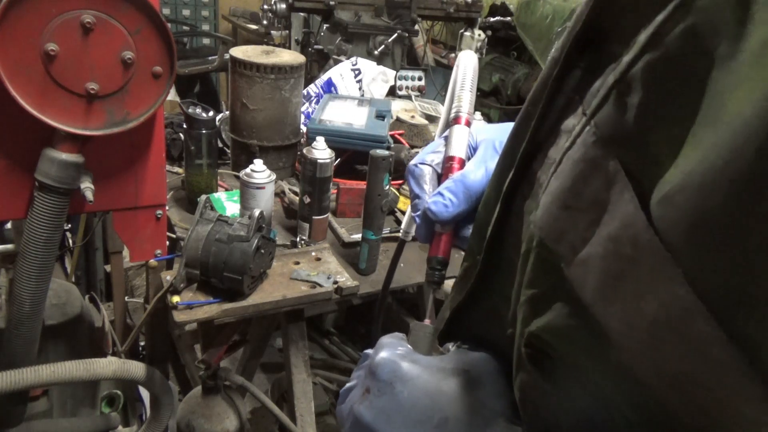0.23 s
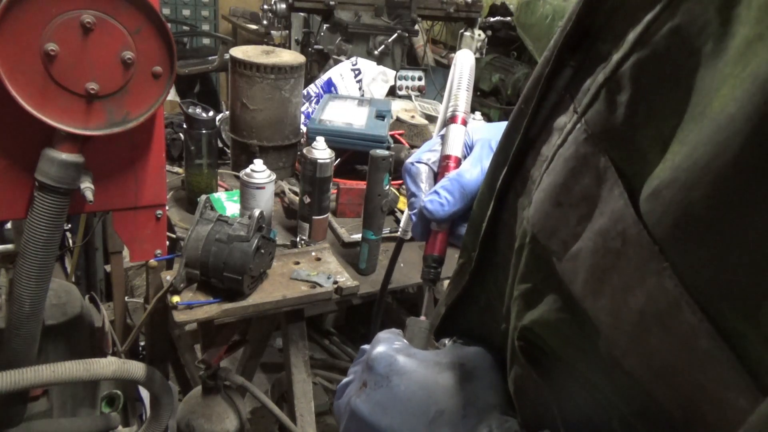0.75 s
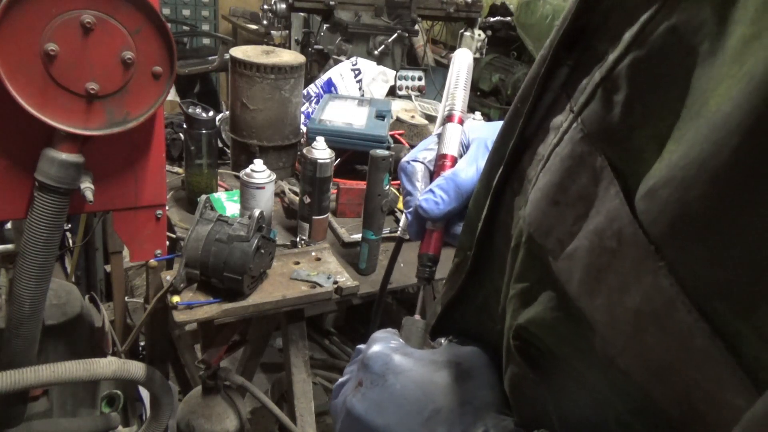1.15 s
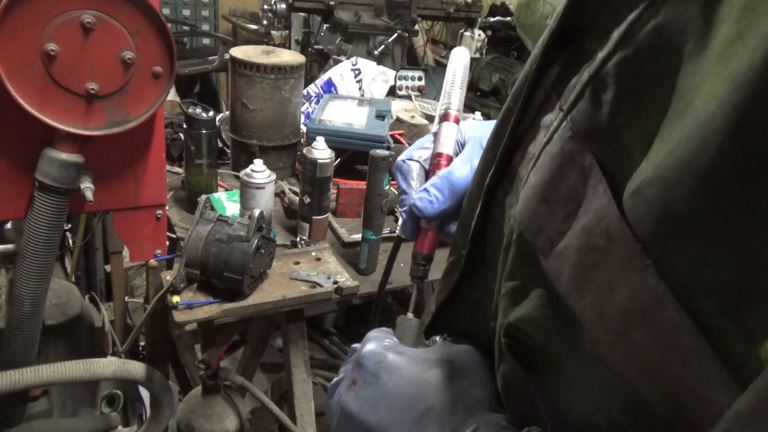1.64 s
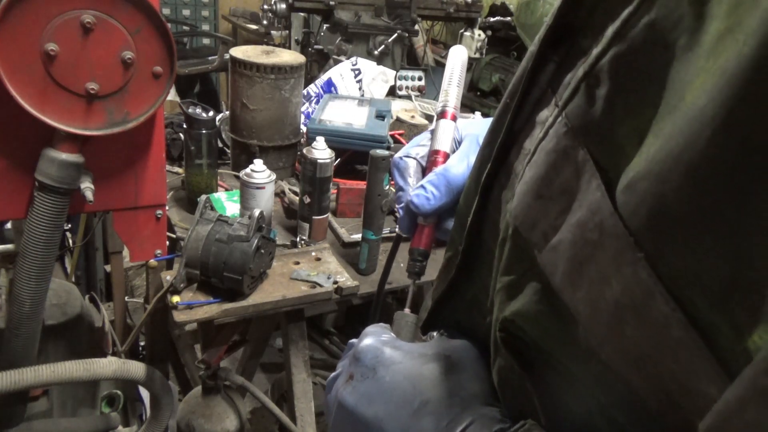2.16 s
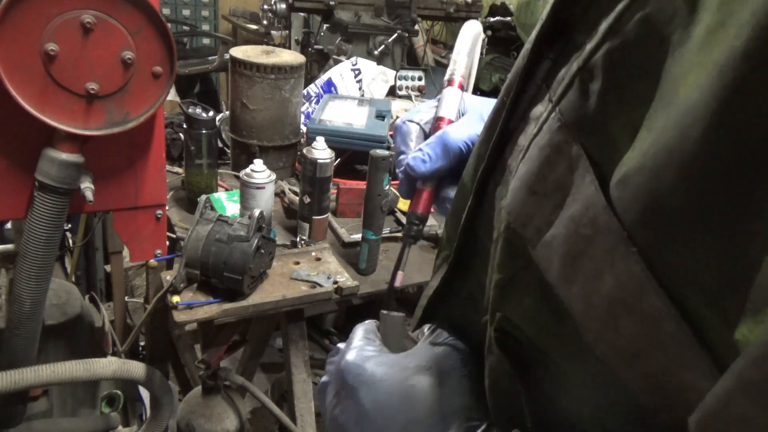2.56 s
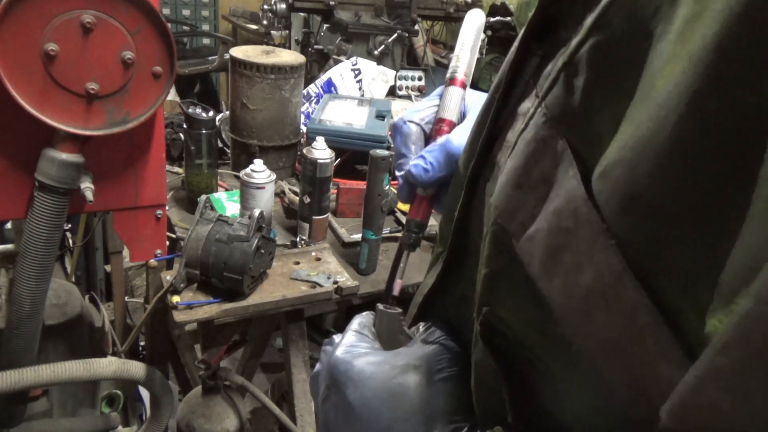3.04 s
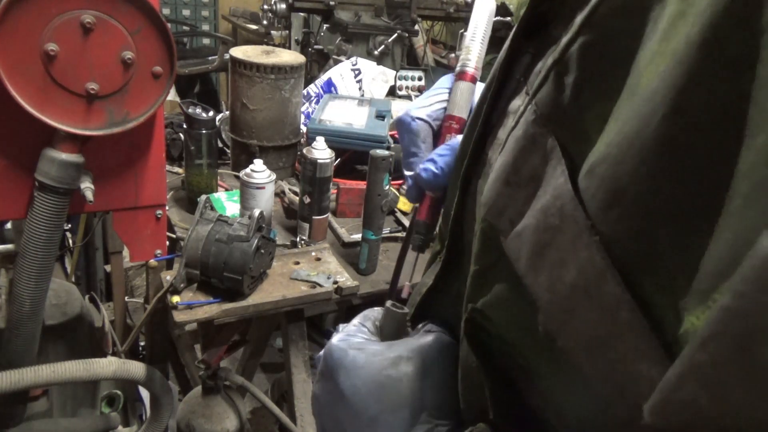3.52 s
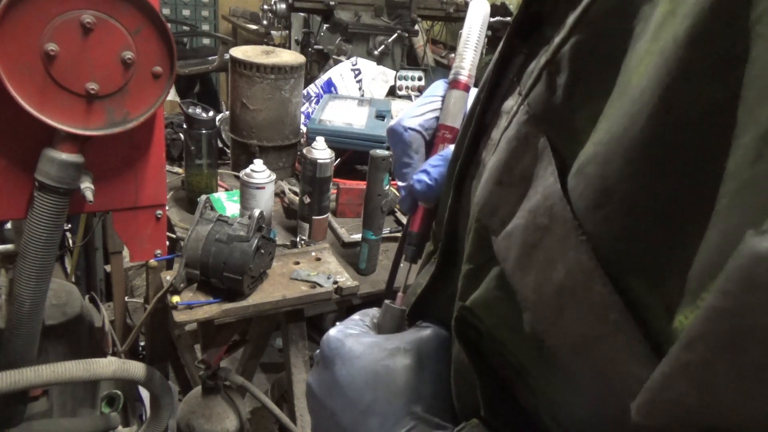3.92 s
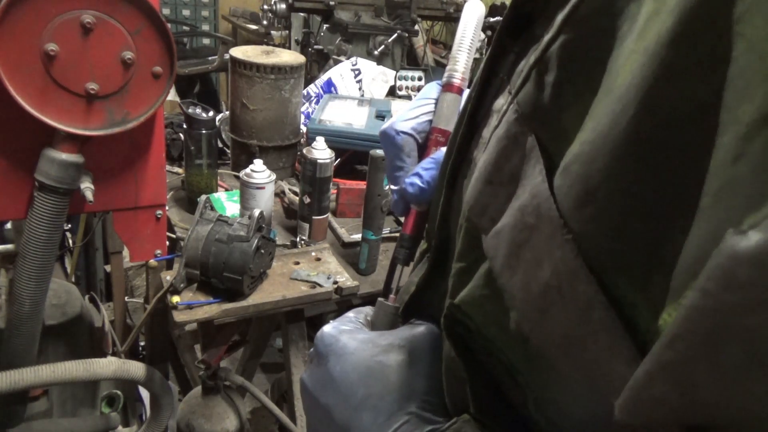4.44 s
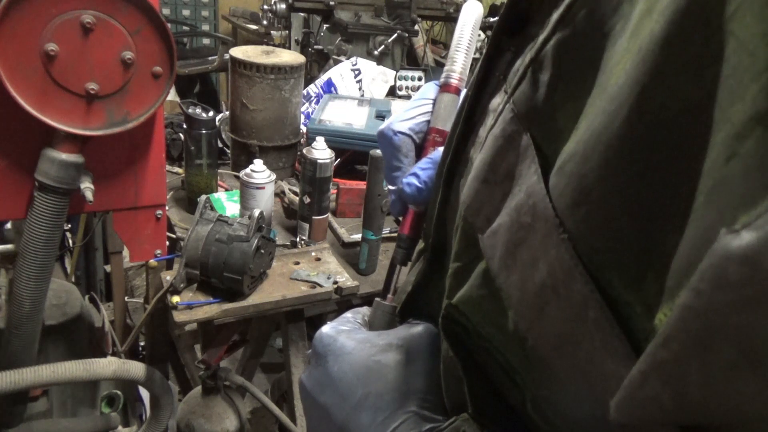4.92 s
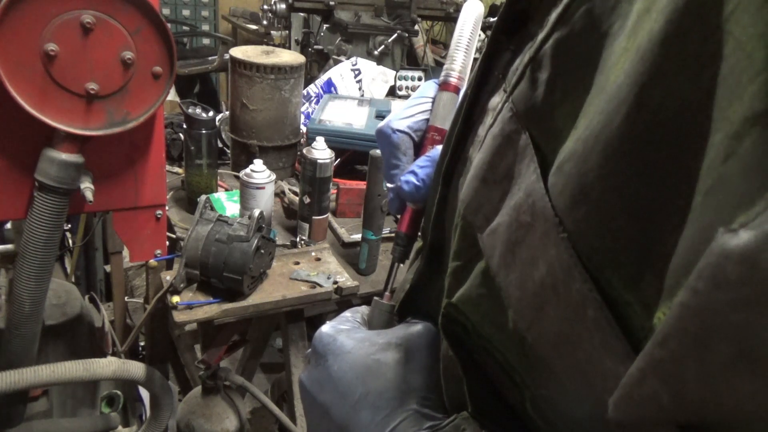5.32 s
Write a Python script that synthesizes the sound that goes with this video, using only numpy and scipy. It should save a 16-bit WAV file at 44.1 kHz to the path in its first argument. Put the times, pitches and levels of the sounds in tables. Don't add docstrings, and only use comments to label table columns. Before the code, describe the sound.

A pneumatic die grinder runs continuously and loudly, close to the microphone, in a cluttered workshop with short, diffuse stereo echoes. From 0 to 2.3 s its toothed cutter presses on a part: a hard buzz around 600 hertz and its multiples, sagging and recovering in pitch, with brief digs, lighter skims and bright gritty hiss. A shrill housing rattle near 7 to 8 kilohertz and steady exhaust air lie over it; faint catches come near 0.5 and 1.3 s. At about 2.3 s the tool lifts, pitch rises slightly, the buzz thins and a piercing, smooth bearing whine stands out, strongest near 3.75 s, while the hiss softens. At 4 s it bites again abruptly, the pitch sagging unevenly and the rough buzz returning with a duller upper edge. A harder tick falls near 4.6 s, a lesser one near 4.85 s. Cutting continues to the 5.6 s end without stopping.

```python
import sys
import numpy as np
from scipy import signal
from scipy.fft import rfft, irfft
from scipy.io import wavfile
from scipy.ndimage import uniform_filter1d

SR = 44100
rng = np.random.default_rng(int(sys.argv[2]) if len(sys.argv) > 2 else 0)


def transcribe(u):
    v = np.clip(np.atleast_2d(u).T, -1, 1)
    q = np.round(v * 32767).astype(np.int16)
    wavfile.write(sys.argv[1], SR, q)


def volts_from_db(level):
    exponent = np.asarray(level, float) / 20
    return 10 ** exponent


N = 245637

# (frequency [Hz], level per Hz [dB])
AIR_COLOUR = [(25, -5.5), (60, -10), (250, -0.5), (560, -3.5), (790, -3.5), (1100, -1), (1600, 0),
              (3000, -1.5), (5000, 4.5), (6500, 3), (9200, 4.5), (12200, -5.5), (14300, 4.5), (17000, 0.5)]
# (frequency [Hz], side level [dB])
ECHO_SPREAD = [(60, -57), (150, -15.5), (400, -28.5), (1200, -23), (3000, -17.5), (6000, -26.5),
               (7800, -19), (10000, -23), (13000, -27)]
# (frequency [Hz], width [Hz], level [dB])
SPINDLE_RING = (13050, 650, -31.5)
# (frequency [Hz], width [Hz], level [dB])
BLOWN_PART = (2970, 620, -46.5)
# (frequency [Hz], width [Hz], share lost [0-1])
SHANK_GAP = (12200, 1100, .75)
# (frequency [Hz], width [Hz], level [dB])
MAIN_RING = [(6540, 970, -25), (7610, 780, -1), (7750, 330, 7), (8270, 1320, -9)]
# (frequency [Hz], width [Hz], level [dB])
UPPER_RING = [(10085, 390, 3.5), (10730, 127, -9.5), (11150, 1070, -3), (12400, 520, -7.5),
              (14060, 640, -11)]
BEARING_ORDERS = [2.115, 4.458, 4.531, 4.844, 8.667, 10.031, 11.646, 11.854, 12.031, 12.198, 12.417, 12.812,
                  13.031, 13.188, 13.417, 14.031, 15.552, 15.792, 16.167, 16.562, 16.792, 16.948, 17.552,
                  17.792, 18.167, 19.698, 20.333, 20.708, 21.094, 21.708]
# (level running free [dB], level under load [dB])
BEARING_LEVELS = [(-47.4, -53.5), (-56.9, -68.0), (-60.7, -67.7), (-58.8, -65.9), (-49.9, -55.4),
                  (-43.4, -48.7), (-37.1, -46.8), (-32.9, -52.6), (-19.9, -32.9), (-37.3, -32.7),
                  (-30.8, -28.0), (-32.0, -26.7), (-33.6, -33.8), (-50.6, -38.3), (-40.6, -35.3),
                  (-47.6, -37.6), (-36.7, -48.5), (-38.3, -43.9), (-35.7, -30.5), (-43.3, -43.5),
                  (-48.5, -41.7), (-44.9, -46.6), (-43.3, -44.9), (-43.3, -44.8), (-43.3, -38.6),
                  (-49.9, -56.4), (-43.0, -45.3), (-45.7, -49.8), (-45.0, -51.1), (-52.6, -55.8)]
# (time [s], speed [turns/s])
SHAFT_SPEED = [(0, 630), (.4, 627), (.6, 620), (.84, 619.2), (1.02, 615.5), (1.13, 604), (1.27, 627.5),
               (1.72, 609.5), (1.85, 619.5), (2.18, 610), (2.42, 636.6), (4.0, 637), (4.4, 614),
               (4.56, 616), (4.77, 601), (5.05, 612.3), (5.45, 600), (5.57, 600.2)]
# (time [s], load [0-1])
LOAD = [(0, 0.97), (1.19, 0.97), (1.2, .1), (1.22, 0.5), (1.23, 1), (2.31, 0.82), (2.33, 0.14),
        (3.99, 0.54), (4.01, .7), (4.1, 0.75), (4.13, 1), (5.57, 0.98)]
# (time [s], share [0-1])
CLEAR = [
    (0, 0.02),
    (2.75, 0.11),
    (2.9, 0),
    (3.05, 0.44),
    (3.5, 0.53),
    (3.75, 0.92),
    (3.95, 0.66),
    (4.05, 0.13),
    (5.57, 0.21),
]
# (time [s], share [0-1])
LEAN = [
    (0, 0.22),
    (1.0, 0.15),
    (2.3, 0.14),
    (2.8, 0.56),
    (3.5, 0.84),
    (4.5, 1),
    (5.57, 1),
]
# (time [s], level of 1st multiple [dB])
UNBALANCE = [(0, -36), (.34, -37), (.98, -39.5), (1.13, -44.5), (1.25, -34.5), (1.68, -41), (2.2, -41.5),
             (2.34, -36.5), (2.48, -38), (2.95, -37), (3.37, -38.5), (3.47, -42), (4.03, -42.5),
             (4.11, -38), (4.85, -40.5), (5.57, -41.5)]
# (multiple [-], level free [dB], level loaded [dB], change with sag [dB/Hz], share of digs [-])
LOW_MULTIPLES = [(2, -45, -37, 0.2578, -0.23), (3, -45, -46, 0.1637, 0.049), (4, -66, -48, 0, .3),
                 (5, -64, -40, 0, 1), (6, -42.5, -42, 0.0966, 0.062), (7, -61, -47.5, -0.01, -0.066),
                 (8, -50, -48, 0.0349, 0.22), (9, -51, -46.5, -0.07, -0.38), (10, -47, -60.5, 0.04, -0.4)]
# (start [s], length [s], strength [dB])
SLACK = [
    (0, 0.3, 14),
    (.95, 0.073, 8),
    (1.38, .07, 7),
    (4.28, 0.4, 5),
    (4.98, 0.049, 9),
    (5.19, .16, 7),
]
# (start [s], length [s], strength [dB])
SKIMS = [
    (.75, .06, -2),
    (.99, 0.057, 2),
    (1.23, .04, -17),
    (1.64, 0.077, 7),
    (1.74, 0.015, 10),
    (2.07, 0.091, 7),
    (2.2, 0.083, 2.5),
    (4.14, 0.27, 10),
    (4.92, 0.092, 10),
    (5.16, 0.18, 2),
]
# (start [s], length [s], strength [dB])
DIGS = [(0, 0.33, 14.5), (.32, 0.14, 5.5), (.47, 0.087, 11.5), (.62, 0.11, 2), (.83, 0.057, 12),
        (1.05, 0.15, 8.5), (1.18, 0.058, 14.5), (1.28, 0.048, 16.5), (1.33, 0.065, 10), (1.5, 0.19, 4),
        (1.69, 0.038, 14.5), (1.8, .14, 9.5), (2.13, 0.048, 16), (2.26, 0.057, 14), (4.0, 0.11, 19),
        (4.42, 0.058, 1), (4.55, 0.035, -3), (4.62, 0.07, 13.5), (4.7, 0.12, -15), (4.84, .06, 12.5),
        (5.34, 0.18, 7), (5.49, .05, 13.5)]
# (start [s], end [s], level [dB])
BOUNCE = (0.515, .562, -45)
# (time [s], peak level [dB])
TICKS = [
    (0.5, -34),
    (1.283, -36),
    (4.621, -21),
    (4.85, -31),
]
# (frequency [Hz], width [Hz], level [dB])
PART_RING = (3024, 300, -47)
# (multiple [-], level free [dB], level loaded [dB])
BUZZ_MULTIPLES = [(11, -41, -43), (12, -34, -35), (13, -42, -33), (14, -53, -35), (15, -58, -43),
                  (16, -54, -37), (17, -58, -39), (18, -58, -35), (19, -66, -39), (20, -50, -38),
                  (21, -60, -40), (22, -68, -49), (23, -66, -50), (24, -70, -56)]


def rms_one(x):
    return x / np.sqrt(np.mean(x ** 2) + 1e-20)


def noise():
    return rng.standard_normal(N)


def in_time(rows):
    s, *columns = np.transpose(rows)
    return [np.interp(np.arange(N) / SR, s, c) for c in columns]


def spells(rows):
    s = np.arange(N) / SR
    edge_s = .012
    curves = []
    for start, length, db in rows:
        inside = np.minimum(s - start, start + length - s)
        curves.append(db * np.clip(inside / edge_s + .5, 0, 1))
    return np.max(curves, axis=0)


def drift(rate_hz):
    r = np.exp(-32 * np.pi * rate_hz / SR)
    slow = signal.lfilter([1], [1, -2 * r, r * r], rng.standard_normal(N // 16 + 2002))[2000:]
    return np.interp(np.arange(N) / 16, np.arange(len(slow)), rms_one(slow))


def filtered(x, hz, kind):
    return signal.sosfilt(signal.butter(2, hz, kind, fs=SR, output="sos"), x)


def resonate(x, hz, width_hz):
    r = np.exp(-np.pi * width_hz / SR)
    stage = [(1 - r * r) / 2, 0, (r * r - 1) / 2, 1, -2 * r * np.cos(2 * np.pi * hz / SR), r * r]
    return signal.sosfilt([stage, stage], x)


def coloured(x, points):
    hz = np.maximum(np.fft.rfftfreq(N, 1 / SR), 10)
    table_hz, table_db = np.transpose(points)
    gain = volts_from_db(np.interp(np.log(hz), np.log(table_hz), table_db))
    return irfft(rfft(x) * gain, N)


def line(turns, order, rough, flicker_hz):
    angle = 2 * np.pi * (order * turns + rng.random())
    rough = np.clip(rough, 0, 1)
    along = np.sqrt(2 - 2 * rough) + np.sqrt(rough) * drift(flicker_hz)
    across = np.sqrt(rough) * drift(flicker_hz)
    return along * np.cos(angle) + across * np.sin(angle)


def shop(x):
    t60_s = 0.16
    s = np.arange(SR // 3) / SR
    tail = rng.standard_normal(len(s)) * volts_from_db(-60 * s / t60_s)
    echoes = signal.fftconvolve(x, tail / np.sqrt(np.sum(tail ** 2)))[:N]
    return coloured(echoes, ECHO_SPREAD)


def air(load, clear):
    return rms_one(coloured(noise(), AIR_COLOUR)) * volts_from_db(-37 + 2.5 * (1 - load) - 4.5 * clear)


def idle(turns, load, clear):
    hum = volts_from_db(-68 + 12 * clear) * line(turns, order=.385, rough=0.41, flicker_hz=8)
    puff = volts_from_db(-66 + 3.3 * drift(3.1)) * rms_one(filtered(noise(), [60, 330], "band"))
    hz, width_hz, level_db = SPINDLE_RING
    spindle = volts_from_db(level_db - 3.1 * clear) * rms_one(resonate(noise(), hz, width_hz))
    hz, width_hz, level_db = BLOWN_PART
    part = volts_from_db(level_db - 6.8 * clear) * rms_one(resonate(noise(), hz, width_hz))
    return (1 - load) * (hum + spindle + part + puff)


def ring_housing(rolling, modes):
    total = np.zeros(N)
    for k, (hz, width_hz, db) in enumerate(modes):
        sign = (-1) ** k
        total += sign * volts_from_db(db + 0.93 * drift(3.9)) * resonate(rolling, hz, width_hz)
    return rms_one(total)


def rattle(turns, load, clear, lean):
    pulse = (1 + 0.36 * np.cos(2 * np.pi * 0.38 * turns)) * volts_from_db(0.5 * drift(72))
    main = ring_housing(noise() * pulse, MAIN_RING)
    upper = ring_housing(noise() * pulse, UPPER_RING)
    main_db = -23.5 + 0.5 * (1 - load) + 3 * lean + 0.5 * clear
    return volts_from_db(main_db) * (main + volts_from_db(0.7 - 11 * lean) * upper)


def bearings(turns, load, clear):
    strongest = np.argmax(np.array(BEARING_LEVELS)[:, 0])
    out = np.zeros(N)
    for k, (order, (free_db, load_db)) in enumerate(zip(BEARING_ORDERS, BEARING_LEVELS)):
        level_db = free_db + load * (load_db - free_db) + 3 * (order > 9)
        rough = .03 if order < 9 else .4
        if k == strongest:
            level_db = level_db - 3 + 13 * clear
            rough = .15 if order >= 9 else rough
        out += volts_from_db(level_db) * line(turns, order, rough, flicker_hz=20)
    return out


def damped(x):
    level_db = 10 * np.log10(uniform_filter1d(x ** 2, size=64) + 1e-12)
    excess_db = uniform_filter1d(np.maximum(level_db + 13.5, 0), size=64)
    return x * volts_from_db(-.6 * excess_db)


def sparks(turns, load, clear, dig_db):
    grit = noise() * (1 + 0.4 * np.cos(2 * np.pi * turns)) * volts_from_db(1.5 * drift(15))
    level_db = -36.5 - 6 * (1 - load) - 7 * clear + .25 * dig_db
    return rms_one(filtered(grit, 8800, "high")) * volts_from_db(level_db)


def low_levels(load, sag_hz, dig_db, clear, lean):
    db = {}
    for k, free_db, load_db, per_hz, share in LOW_MULTIPLES:
        k = round(k)
        wander_db = 2.5 * (.54 if k in (2, 5, 6) else 1)
        loaded = load * (load_db - free_db + per_hz * sag_hz)
        db[k] = free_db + loaded + share * dig_db + wander_db * drift(11.2)
    for k in (2, 4, 5, 7, 8, 9):
        db[k] += -10 * clear
    skim_db = spells(SKIMS)
    db[3] -= spells(SLACK)
    db[4] += 6.5 * lean * load - 0.56 * skim_db * (1 - lean)
    db[5] += -7 * lean * load - skim_db
    db[10] += 17.5 * lean * load
    return db


def rotor(turns, db):
    first_db = in_time(UNBALANCE)[0] + 1.3 * drift(10)
    hum = volts_from_db(first_db) * line(turns, order=1, rough=.007, flicker_hz=25)
    hum += volts_from_db(db[3] - 1.5) * line(turns, order=3, rough=.03, flicker_hz=40)
    return hum + volts_from_db(db[6] - 1.5) * line(turns, order=6, rough=0.083, flicker_hz=29.5)


def catches(turns):
    s = np.arange(N) / SR
    start, end, level_db = BOUNCE
    gate = np.clip(np.minimum(s - start, end - s) / 0.013, 0, 1)
    halves = sum(line(turns, k + .5, rough=0.108, flicker_hz=30) for k in range(2, 8))
    burst = filtered(noise(), [1100, 7000], "band")
    fade = sum(volts_from_db(db - 60 * np.abs(s - at) / .02) * (s > at) for at, db in TICKS)
    return volts_from_db(level_db) * gate * halves + burst * fade


def burr(turns, load, db, dig_db, lean):
    low = volts_from_db(db[2]) * line(turns, order=2, rough=.012, flicker_hz=30)
    low += volts_from_db(db[4]) * line(turns, order=4, rough=0.054, flicker_hz=40)
    low += volts_from_db(db[5]) * line(turns, order=5, rough=.07, flicker_hz=45)
    for k in range(7, 11):
        low += volts_from_db(db[k]) * line(turns, k, rough=.1, flicker_hz=30)

    cut = turns + 0.0031 * drift(115)
    upper = np.zeros(N)
    for k, free_db, load_db in BUZZ_MULTIPLES:
        tilted_db = load_db + 0.4 + 0.93 * (k - 14)
        level_db = free_db + load * (tilted_db - free_db) + 2.2 * drift(7)
        upper += volts_from_db(level_db) * line(cut, round(k), rough=0.3, flicker_hz=25)
    surge_db = 3.5 * load * drift(5.3)
    upper *= volts_from_db(-1.5 - 5 * lean * load + .074 * dig_db + surge_db)

    chips = noise() * (1 + 1.75 * np.cos(2 * np.pi * cut))
    hz, width_hz, level_db = PART_RING
    part_db = level_db - 5 + .5 * (db[5] + 49)
    part = volts_from_db(part_db) * load * rms_one(resonate(chips, hz, width_hz))
    return low + part + upper


def scene():
    free_hz, inertia_s, hunt_hz = 637, .05, .5
    speed = uniform_filter1d(in_time(SHAFT_SPEED)[0], size=int(inertia_s * SR)) + hunt_hz * drift(3)
    turns = np.cumsum(speed) / SR
    load = np.clip(in_time(LOAD)[0], 0, 1)
    clear, lean, dig_db = in_time(CLEAR)[0], in_time(LEAN)[0], spells(DIGS)
    db = low_levels(load, free_hz - speed, dig_db, clear, lean)

    housing = damped(bearings(turns, load, clear) + rattle(turns, load, clear, lean))
    front = air(load, clear) + idle(turns, load, clear) + sparks(turns, load, clear, dig_db)
    front += rotor(turns, db) + catches(turns) + burr(turns, load, db, dig_db, lean)

    hz, width_hz, share = SHANK_GAP
    housing = housing - share * (1 - load) * resonate(housing, hz, width_hz)
    front = front - share * (1 - load) * resonate(front, hz, width_hz)

    pan_db = -1.5 + lean
    panned = housing * volts_from_db(0.75 * np.array([pan_db, -pan_db]) / 2)
    return front + panned + shop(front + housing) * [[1], [-1]]


def roll_off(x):
    return signal.sosfilt(signal.butter(12, 16820, fs=SR, output="sos"), x)


def record(dry):
    hz = np.fft.rfftfreq(N, 1 / SR)
    notch = 1 - .7 * np.exp(-.5 * ((hz - 765) / 40) ** 2)
    mix = irfft(rfft(dry) * (hz < 15750) * notch, N)
    return roll_off(mix)


dry = scene()
out = record(dry)
transcribe(out)
```